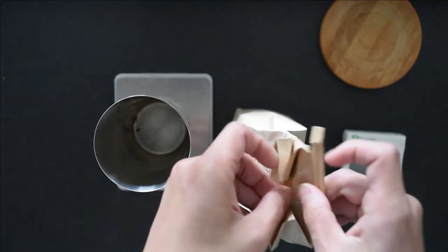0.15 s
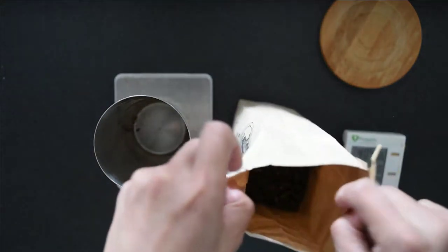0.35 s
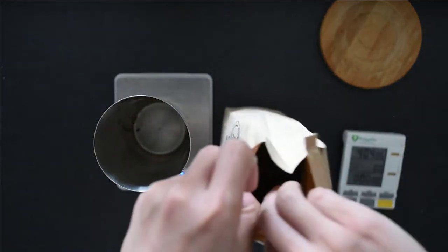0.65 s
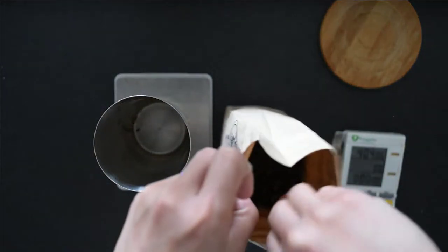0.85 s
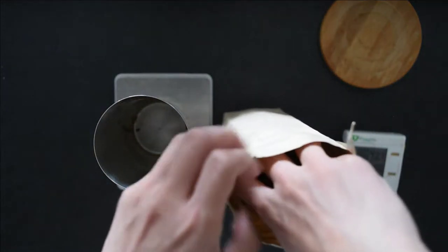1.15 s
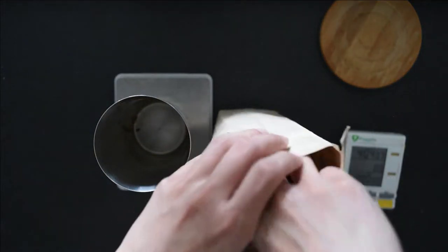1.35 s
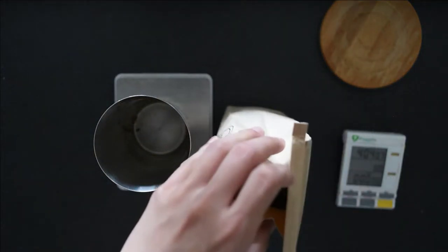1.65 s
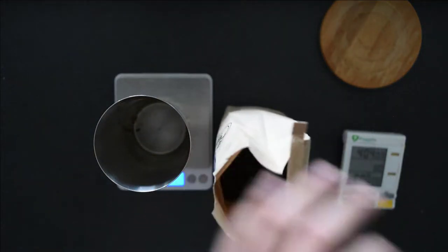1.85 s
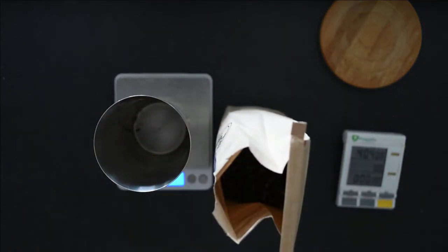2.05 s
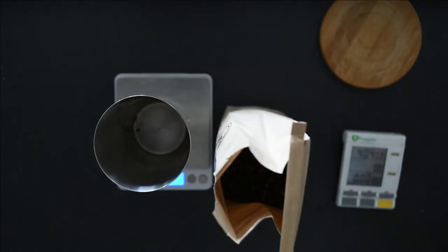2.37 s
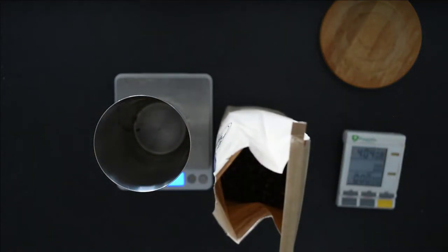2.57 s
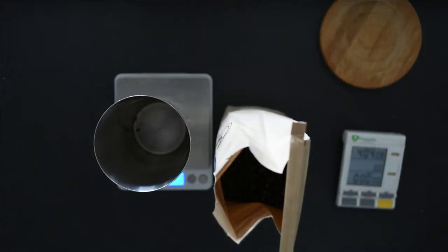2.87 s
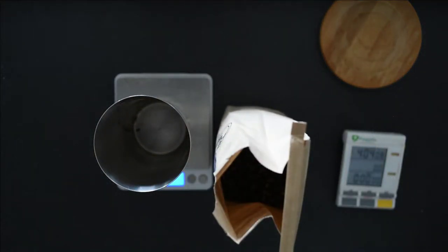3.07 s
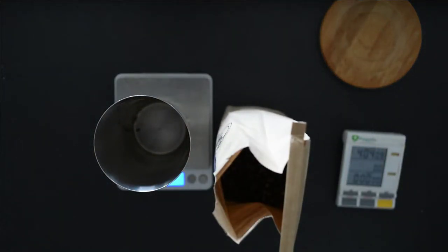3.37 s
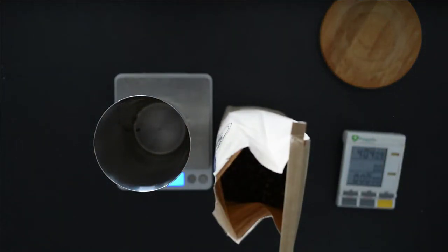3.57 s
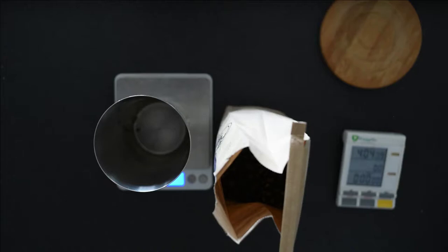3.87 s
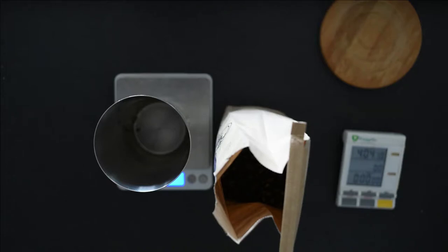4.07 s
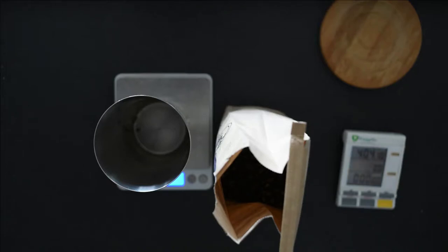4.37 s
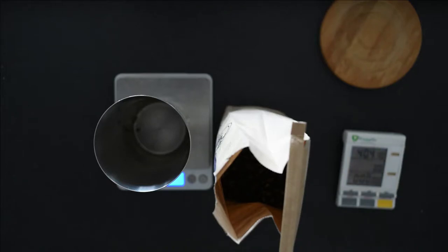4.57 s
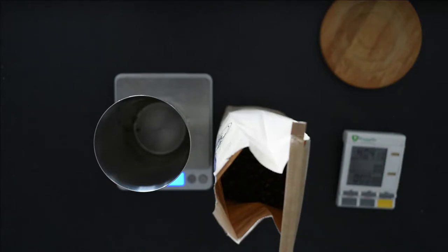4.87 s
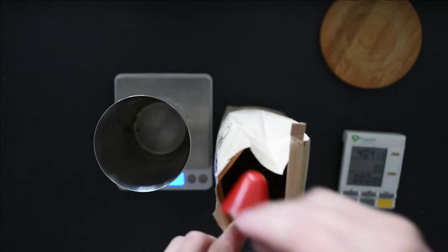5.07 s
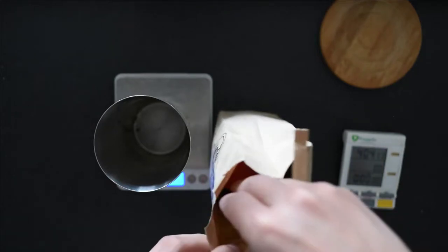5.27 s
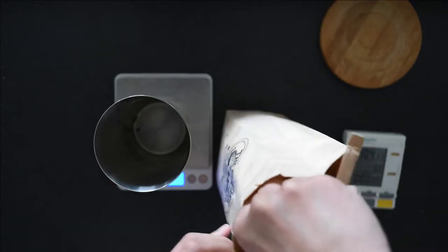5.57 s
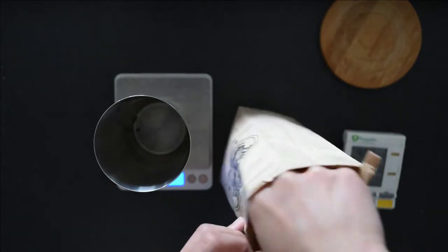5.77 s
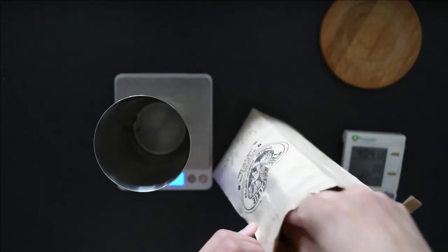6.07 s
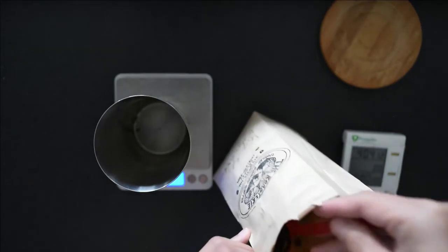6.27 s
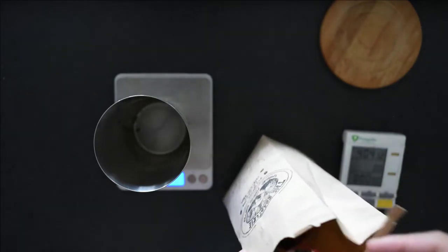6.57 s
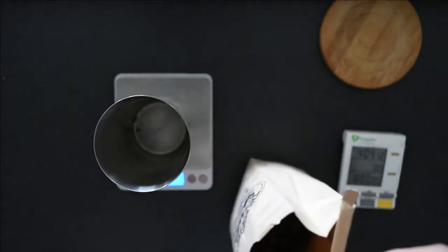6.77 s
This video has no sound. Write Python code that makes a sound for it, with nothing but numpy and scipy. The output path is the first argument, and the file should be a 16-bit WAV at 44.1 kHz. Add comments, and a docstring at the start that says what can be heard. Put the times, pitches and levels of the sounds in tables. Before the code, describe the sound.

A quiet kitchen with a faint soft rush and short room echo, heard close in stereo. From 0 to 0.2 s paper rustles lightly, then from 0.2 to 0.5 s stiff creases snap loudly in a dense run with hollow wall pops. Smaller crinkles follow; another crackling burst comes at 1.0 to 1.2 s and a last one around 1.4 to 1.5 s, fading by 1.9 s. Near silence until about 2.75 s, when a wooden drawer bumps softly to the left. Utensils clack at 3.3 s and clatter from 3.6 to 3.7 s, with light sliding to 4.1 s; the drawer thuds shut at 4.35 s. From 5.1 s a scoop taps the bag, knocking faster from 5.5 s. Beans crunch and grind, strongest at 5.8 to 6.3 s, with crisp paper cracks. After 6.4 s it thins to tiny bean ticks and quiet.

```python
"""Opening a bag of coffee beans

A stiff paper bag is pulled open on a table in a quiet kitchen, close to a microphone with two ports.
Creases snap as decaying runs of slips filtered by paper resonances; walls rustle as dense small contacts.
Off to the left a drawer slides, utensils clatter and the drawer thuds shut: damped modes of a wooden box.
Then a scoop taps its way into the bag and digs through the beans, and a few tick as it is lifted out."""
import sys
import numpy as np
from scipy import signal
from scipy.fft import rfft, irfft
from scipy.io import wavfile
from scipy.ndimage import uniform_filter1d

SR = 44100
rng = np.random.default_rng(int(sys.argv[2]) if len(sys.argv) > 2 else 0)


def wrap_up_sound(samples):
    """Save the sound to the file named by the first command line argument, as 16-bit audio."""
    columns = np.atleast_2d(samples).T
    # keep every value between -1 and 1, then stretch to whole-number steps
    tamed = np.clip(columns, -1, 1)
    steps = np.round(tamed * 32767).astype(np.int16)
    wavfile.write(sys.argv[1], SR, steps)


N = 305613
TIME = np.arange(N) / SR  # s
TOP_HZ = 16500
FIRM_DB = -34  # handling gentler than this has relatively more body

# broad spectrum of the paper: (frequency [Hz], gain [dB])
PAPER = [(47, -57), (80, -25.5), (178, -16.5), (369, -9), (550, -10), (734, -3), (820, -7.5), (937, -3),
         (1430, -3.5), (1740, -1.5), (3170, -7.5), (3540, -5), (3960, -12), (8410, -10), (13000, -21),
         (16000, -31.5)]
# resonances of the empty paper walls: (frequency [Hz], width [Hz], peak over the broad spectrum [dB])
BAG_RINGS = [(373, 12, 5), (1154, 59, 3), (1555, 100, 2), (3760, 170, -0.5), (4365, 610, 6.5),
             (5150, 340, 2), (7220, 182, 3), (8640, 410, 1)]


def undb(db):
    """Decibels are logarithmic: 20 dB is a tenfold amplitude."""
    return 10 ** (np.asarray(db) / 20)


def rms(x):
    """Root mean square amplitude, the measure of mean power."""
    return np.sqrt(np.mean(x ** 2)) + 1e-12


def add(out, s, x):
    """Superposition: sound pressures add, here x into out from time s on."""
    i = max(int(s * SR), 0)
    out[..., i:i + x.shape[-1]] += x[..., :N - i]


def band(x, lo_hz, hi_hz):
    """Causal band-pass: only the frequencies between two cutoffs are passed."""
    edges = [lo_hz, min(hi_hz, SR / 2 - 1)]
    return signal.sosfilt(signal.butter(3, edges, "band", fs=SR, output="sos"), x)


def colour(x, points, rings, size=4096):
    """Source and filter: a minimum-phase body with a broad spectrum and a few resonances shapes x."""
    f = np.fft.rfftfreq(size, 1 / SR) + 1
    hz, db = np.transpose(points)
    broad = np.interp(np.log(f), np.log(hz), db)
    peaks = sum(d / (1 + (2 * (f - c) / w) ** 2) for c, w, d in rings)
    # folding the cepstrum onto positive times gives minimum phase
    cepstrum = irfft(np.log(undb(broad + peaks)))[:size // 2]
    cepstrum[1:] *= 2
    response = irfft(np.exp(rfft(cepstrum, size)))
    return signal.fftconvolve(x, response)[:len(x)]


def widen(mid, side, wide_hz, side_db):
    """Spatial coherence: two close ports hear the same bass but differ in the treble."""
    high_pass = signal.butter(2, wide_hz, "high", fs=SR, output="sos")
    side = undb(side_db) * signal.sosfilt(high_pass, side)
    return np.array([mid + side, mid - side])


def left_first(pair, count):
    """Path difference: sound from the left reaches the right port count samples later."""
    return np.array([pair[0], np.roll(pair[1], count)])


def room_tone():
    """Stationary filtered noise: a faint rush with a thin electrical whine, and rumble in each port."""
    # broad spectrum of the quiet room: (frequency [Hz], gain [dB])
    quiet_colour = [(15, -68), (25, -29), (49, -10), (91, -12), (155, -2), (232, -1), (265, -7),
                    (328, -2.5), (478, -7.5), (700, -7.5), (1470, -8.5), (5630, -22), (11000, -28),
                    (15200, -35)]
    # its resonances: (frequency [Hz], width [Hz], peak over the broad spectrum [dB])
    quiet_rings = [(308, 73, 5.9), (9510, 1200, 9.4), (15690, 124, 4.5)]
    mid, side = (colour(rng.standard_normal(N), quiet_colour, quiet_rings) for port in range(2))
    rush = widen(mid, side, 1124, -2.0) * undb(-61) / rms(mid)
    rumble = band(rng.standard_normal((2, N)), 20.4, 135)
    return rush + undb(-91.5) * rumble / rms(rumble)


def snap(row, points, rings, body_db, glint_db, pan_db, attack_s, panel_db, uneven_db,
         table_db, table_t60, treble_t60, side_db, size=4096):
    """Stick-slip: a quick run of unequal slips rings one panel; the table and things nearby scatter it."""
    # parts of a snap (body, middle, crack, glint): (from [Hz], to [Hz])
    snap_zones = [(125, 700), (700, 3200), (3200, 10000), (10000, 17000)]
    _, db, crack_db, hz, t60 = row
    # a gentler snap keeps more body and glint; a sharper crack brings more glint (dB per dB)
    gentle = FIRM_DB - db
    body = body_db + 0.3836 * gentle
    glint = glint_db + 0.5339 * gentle + 1.25 * crack_db
    zone_db = (body, 0, crack_db, glint)
    t = np.arange(size) / SR
    slips = undb(uneven_db * rng.standard_normal(size))
    slips = slips / rms(slips) * undb(-60 * t / t60)
    scatter = undb(table_db - 60 * t / table_t60)
    shape = (1 - np.exp(-t / attack_s)) * (slips + scatter)
    panel = (hz, hz / 2, panel_db)
    pair = []
    for port in range(2):
        burst = colour(shape * rng.choice([-1, 1], size), points, rings + [panel])
        total = 0
        for (lo, hi), part_db in zip(snap_zones, zone_db):
            # the higher the part, the sooner it is damped
            part = band(burst, lo, hi) * undb(-60 * t / treble_t60 * lo / TOP_HZ)
            total = total + undb(db + part_db) * part / rms(part[:int(.006 * SR)])
        pair.append(total)
    return widen(*pair, 1760, side_db) * undb(np.array([[pan_db], [-pan_db]]) / 2)


def pops(rows, t60, rough_db, attack_s, size=8192):
    """Damped flexural mode: a broad thin wall flexes once and rings hollow, with a rough edge."""
    out, t = np.zeros(N), np.arange(size) / SR
    for s, db, hz in rows:
        rough = band(rng.standard_normal(size), hz / 2, hz * 2)
        ring = np.sin(2 * np.pi * hz * t) + undb(rough_db) * rough / rms(rough)
        envelope = undb(db - 60 * t / t60) * (1 - np.exp(-t / attack_s))
        add(out, s, envelope * ring)
    return out


def ticks(per_s, spread_db):
    """Poisson-like impulses: lone clicks at random moments, most small and a few large."""
    sizes = undb(spread_db * np.minimum(rng.exponential(size=N), 3)) * rng.choice([-1, 1], N)
    clicks = sizes * (rng.random(N) < per_s / SR)
    return clicks / rms(clicks)


def grains(per_s, spread_db, crackle_per_s, crackle_db, bed_db):
    """Granular excitation: small contacts ring a few cycles each, with broad crackles and even rubbing."""
    pitched = np.zeros(N)
    for c in 180 * 2. ** np.arange(7):  # octave centres in Hz
        clicks = ticks(per_s * np.sqrt(c / 1000), spread_db)
        pitched += band(clicks, c / np.sqrt(2), c * np.sqrt(2))
    # crackle power decays with a time constant of 0.94 ms
    decay = np.exp(-1 / (0.00094 * SR))
    crackle = signal.lfilter([1], [1, -decay], ticks(crackle_per_s, spread_db) ** 2)
    noise_power = undb(2 * crackle_db) * crackle / crackle.mean() + undb(2 * bed_db)
    return pitched + np.sqrt(noise_power) * rng.standard_normal(N)


def strokes(rows, attack_s, release_s):
    """Powers add: each stroke swells up to its time, holds and dies away; gains for low, middle, high."""
    power = np.zeros((3, N))
    for s, length, db, hiss_db, low_db in rows:
        rise = np.clip((TIME - s) / attack_s + 1, 0, 1)
        fall = np.exp(-np.clip((TIME - s - length) / release_s, 0, 20))
        power += np.outer(undb([db + low_db, db, db + hiss_db]), rise * fall) ** 2
    return np.sqrt(power)


def rustle(gains, contacts, points, rings, side_db):
    """Friction noise: contacts excite a body; the handling sets its low, middle and high parts."""
    # parts of a rustle (low, middle, high): (from [Hz], to [Hz])
    zones = [(60, 700), (700, 3200), (3200, 17000)]
    loudness = np.sqrt(np.abs(uniform_filter1d(contacts ** 2, size=64)))
    scattered = loudness * rng.standard_normal(N)
    pair = []
    for push in (contacts, scattered):
        sound = colour(push, points, rings)
        parts = [band(sound, *zone) for zone in zones]
        pair.append(sum(p / rms(p) * gain for p, gain in zip(parts, gains)))
    return widen(*pair, 1700, side_db)


def bag():
    """Snap-through buckling: creases crack over a fine crinkle as hands open the bag.

    Its walls pop then, and again while the scoop works."""
    # creases snapping through: (time [s], level of 700-3200 Hz [dB], crack 3-10 kHz over it [dB],
    # panel pitch [Hz], t60 of the slips [s])
    creases = [(0.0093, -37, 3.5, 2130, .008), (0.0577, -42.5, 6.5, 1820, 0.014),
               (0.1124, -41.5, -3, 1930, .025), (0.2158, -31, -9, 1650, .01),
               (0.2338, -24.5, -16, 2010, 0.0098), (0.24, -22.5, 6, 3420, 0.0096),
               (0.2437, -26, 3, 2220, 0.051), (0.2569, -25, 0, 1540, .011),
               (0.2601, -23, -10.5, 1480, .008), (0.2654, -18, -5.5, 2110, 0.011),
               (0.2974, -27, -13, 1630, 0.014), (0.3186, -23.5, -19, 1400, 0.0063),
               (0.3275, -19.5, -12.5, 1810, 0.0083), (0.3426, -24.5, -4, 1270, 0.012),
               (0.3931, -19.5, -1, 1570, 0.042), (0.515, -22.5, -9, 1446, 0.022),
               (0.6049, -46, -14.5, 1350, .02), (0.6739, -39.5, -10, 1320, 0.095),
               (0.7584, -45.5, -7, 1060, 0.044), (0.9736, -24, -3, 2010, .05),
               (1.0143, -18.5, -7, 2020, 0.01), (1.0198, -23, -10, 1865, 0.045),
               (1.0268, -28.5, 11, 1930, 0.017), (1.0315, -28.5, 0, 1840, .022),
               (1.0419, -25.5, -0.5, 1960, 0.015), (1.0757, -27, -12, 1720, .027),
               (1.0817, -29.5, -10, 1690, .038), (1.1051, -27.5, 0, 2400, .014),
               (1.1476, -18.5, -8.5, 2150, 0.014), (1.164, -28, -1, 1830, 0.031),
               (1.2115, -38, -2.5, 1580, 0.02), (1.3914, -32, -1, 2150, 0.017),
               (1.429, -35.5, -17, 1040, .025), (1.4369, -27.5, -7.5, 1620, 0.027),
               (1.5048, -21, -4, 1450, 0.021), (1.5176, -21.5, -4.5, 1490, 0.013),
               (1.5245, -22.5, -5, 1620, 0.014), (1.8226, -44, -11, 1030, 0.1),
               (1.8697, -50, -8, 1410, 0.047)]
    # a whole wall buckling with a hollow pop: (time [s], level [dB], pitch [Hz])
    buckles = [(0.2657, -21.5, 480), (0.3275, -26, 586), (0.3935, -20, 385), (0.674, -41.5, 159),
               (1.027, -31, 184), (1.089, -38, 480), (1.388, -40, 188), (5.1696, -43, 190),
               (5.2273, -32, 596), (6.0561, -28.5, 400), (6.2509, -29.5, 425), (6.285, -37, 192)]
    # hands pulling and smoothing the paper: (time [s], length [s], level before trim [dB],
    # hiss over that level [dB], flapping over that level [dB])
    pulls = [(0, 0.09, -45.5, -3, -7.5), (.19, 0.097, -48, 2.5, -10), (.285, .07, -37.5, -8, -2),
             (.41, 0.028, -43, -8, 1.5), (.55, 0.03, -49.5, -21, -16), (.67, 0.1, -52.5, -6.5, -0.5),
             (.82, 0.16, -55, 1.5, -13), (.975, 0.093, -41, -12, -3), (1.075, 0.076, -34.5, -2.5, -7.5),
             (1.19, 0.043, -51, -3, 1), (1.33, 0.027, -46, -2, -13), (1.38, 0.092, -43, -8, -7.5),
             (1.53, 0.021, -44.5, -3, 5), (1.6, 0.11, -58.5, -3, -6), (1.855, 0.016, -56, -5, 3)]
    out = np.zeros((2, N))
    for row in creases:
        crack = snap(row, PAPER, BAG_RINGS, body_db=-17.5, glint_db=-9, pan_db=0.4, attack_s=0.00081,
                     panel_db=7.0, uneven_db=5.5, table_db=-19.0, table_t60=0.066,
                     treble_t60=0.084, side_db=-7.5)
        add(out, row[0], crack)
    out += pops(buckles, t60=0.053, rough_db=-7, attack_s=0.0017)
    crinkle = grains(per_s=190, spread_db=2.5, crackle_per_s=140, crackle_db=-2, bed_db=-5)
    gains = undb(-0.75) * strokes(pulls, attack_s=0.024, release_s=0.034)  # trim in dB
    out += rustle(gains, crinkle, PAPER, BAG_RINGS, side_db=-3.5)
    return left_first(out, count=1)


def kitchen(x, wet_db, build_s=0.0016, size=32768):
    """Reverberation: diffuse echoes of hard walls decay exponentially; the high treble dies first."""
    # decay of the kitchen: (frequency [Hz], t60 [s])
    room_decay = [(150, 0.44), (400, 0.57), (1200, 0.5), (3000, 0.43), (7000, 0.42), (14000, 0.26)]
    t, (hz, t60) = np.arange(size) / SR, np.transpose(room_decay)
    pair = []
    for port in range(2):
        tail = np.zeros(size)
        for c in 90 * 2. ** np.arange(8):  # octave centres in Hz
            noise = band(rng.standard_normal(size), c / np.sqrt(2), c * np.sqrt(2))
            tail += noise * undb(-60 * t / np.interp(np.log(c), np.log(hz), t60))
        tail *= 1 - np.exp(-(t / build_s) ** 2)
        pair.append(signal.fftconvolve(x.mean(0), tail / np.linalg.norm(tail))[:N])
    return undb(wet_db) * widen(*pair, 935, -1.6)


def thuds(size=16384):
    """Modal impact: each bump is a short rough push on a wooden box; softer contact is duller."""
    # the drawer bumping its frame: (time [s], level before trim [dB], contact [s], heft below 150 Hz [dB])
    bumps = [(2.744, -46.5, 0.0041, -6), (2.756, -44, 0.0063, -14), (2.826, -51, 0.0024, -5.5),
             (4.347, -37, 0.00065, 8), (4.353, -32, 0.0028, 0), (4.367, -42, 0.00064, -10.5),
             (4.377, -35.5, 0.0034, -2)]
    # modes of its wooden box: (frequency [Hz], relative level before contact and heft [dB], t60 [s])
    box_modes = [(73, -30.5, 0.16), (112, -6.5, 0.18), (150.5, -10, 0.092), (231.7, 4, 0.11),
                 (305.6, -4, 0.15), (413, -10.5, 0.11), (580, -18, 0.039), (799, -3, 0.075),
                 (890, 0.5, 0.077), (1024, -3.5, .08), (1490, -34, 0.047)]
    out, t = np.zeros(N), np.arange(size) / SR
    for s, db, contact_s, heft_db in bumps:
        ring = np.zeros(size)
        for hz, d, t60 in box_modes:
            gain = undb(d + heft_db * (hz < 150) - 60 * t / t60) / np.hypot(1, hz * contact_s)
            ring += gain * np.sin(2 * np.pi * hz * t)
        top_hz = np.clip(2.02 / contact_s, 400, 1800)
        scuff = band(rng.standard_normal(size), 144, top_hz) * undb(-60 * t / 0.05)
        # levels are set over the first 20 ms
        blow = ring / rms(ring[:SR // 50]) + undb(-3.5) * scuff / rms(scuff[:SR // 50])
        add(out, s, undb(db - 1.5) * blow * (1 - np.exp(-t / contact_s)))  # trim of -1.5 dB
    # the thuds carry no deep bass
    return band(out, 66, 3300)


def drawer():
    """Airborne and structure-borne sound: sliding and knocks from the left, bumps equal in both ports."""
    # utensils knocking: (time [s], level of 700-3200 Hz [dB], crack 3-10 kHz over it [dB],
    # pitch [Hz], t60 of the slips [s])
    knocks = [(2.7749, -57, 10, 1160, 0.024), (3.3139, -26, -11.5, 1210, 0.018),
              (3.583, -32, -2, 1910, 0.017), (3.6311, -27.5, -14.5, 1460, .016),
              (3.6533, -30, -19, 1020, 0.015), (3.6744, -33, -24, 940, 0.029), (3.723, -35, -5, 1270, 0.04),
              (3.7285, -37.5, -24, 1240, 0.04), (3.9396, -42.5, -7.5, 1420, .016),
              (3.9784, -34, -11.5, 1750, .035), (4.068, -42.5, -15, 1660, 0.021)]
    # a heavy utensil dropping on the floor of the tray: (time [s], level [dB], pitch [Hz])
    drops = [(3.3138, -27.5, 440), (3.583, -37, 464), (3.7286, -38, 407)]
    # the drawer running and things sliding in it: (time [s], length [s], scrape before trim [dB],
    # hiss over that level [dB], rumble over that level [dB])
    slides = [(2.77, 0.1, -57.5, -5.5, 3), (2.89, .08, -63.5, 3.5, 2), (3.27, 0.047, -56.5, -3.5, -2),
              (3.33, 0.074, -46, -13, -5), (3.56, 0.019, -42, -10, -8), (3.63, .12, -49.5, -27, -2),
              (3.83, 0.28, -52.5, -8, -26), (3.92, 0.021, -45.5, -10, -6.5), (4.22, 0.1, -67, 4.5, -14),
              (4.34, 0.056, -53.5, -3, -3.5)]
    # broad spectrum of the utensils: (frequency [Hz], gain [dB])
    utensils = [(59, -46), (100, -30), (308, -13), (424, -1.5), (662, -7), (768, -13.5), (1550, -16),
                (2080, -9.5), (2580, -6.5), (4020, -12.5), (4770, -7), (5300, -10), (7610, -12),
                (9410, -13), (16000, -38)]
    # broad spectrum of the drawer runners: (frequency [Hz], gain [dB])
    runners = [(47, -56), (80, -10), (142, -13), (194, -53), (232, -3), (431, 8), (550, -5.5), (1400, -4),
               (1700, -5), (2970, -9), (5520, -13), (9610, -11.5), (16000, -41)]
    # resonances of the utensil tray: (frequency [Hz], width [Hz], peak over the broad spectrum [dB])
    tray_rings = [(404, 56, 5.7), (865, 170, 3.6), (1540, 230, 4.3), (2700, 59, 1.5), (7150, 190, 2.6)]
    out = np.zeros((2, N))
    for row in knocks:
        knock = snap(row, utensils, tray_rings, body_db=-17.5, glint_db=-18.5, pan_db=2.5,
                     attack_s=0.00023, panel_db=12.5, uneven_db=4, table_db=-6.5, table_t60=0.17,
                     treble_t60=0.054, side_db=-5)
        add(out, row[0], knock)
    out += pops(drops, t60=0.068, rough_db=-9, attack_s=0.0011)
    sliding = grains(per_s=260, spread_db=2.5, crackle_per_s=120, crackle_db=-6.0, bed_db=-2.5)
    gains = undb(-1.5) * strokes(slides, attack_s=0.027, release_s=.022)  # trim in dB
    out += rustle(gains, sliding, runners, tray_rings, side_db=-3.5)
    return left_first(out, count=7) + thuds()


def scoop():
    """Impact and granular friction: the scoop taps, grinds through beans, and a few tick as it leaves."""
    # the scoop striking bag and beans: (time [s], level of 700-3200 Hz [dB],
    # crack 3-10 kHz over it [dB], panel pitch [Hz], t60 of the slips [s])
    taps = [(5.1153, -52, 1.5, 3700, 0.071), (5.1698, -43.5, -1, 1680, 0.087),
            (5.2273, -29, -5.5, 1140, 0.013), (5.319, -40, -1, 1240, 0.048), (5.3868, -44, -3, 1350, 0.08),
            (5.4832, -38, -6.5, 1260, 0.019), (5.5223, -35.5, -15, 1590, 0.017),
            (5.5517, -33.5, -9, 1330, 0.063), (5.5673, -32.5, -14, 1310, .015),
            (5.5711, -25, -16, 1290, 0.019), (5.6309, -27.5, -5, 1300, 0.0062),
            (5.6779, -19, -14.5, 1890, 0.011), (5.6494, -36, -20, 1220, .01),
            (5.7407, -32, -12, 1740, 0.015), (5.7456, -25, -4, 1520, 0.018),
            (5.8382, -22.5, -1.5, 1500, 0.025), (5.8519, -26, 3, 1860, 0.019),
            (6.0168, -33, -9, 1490, .028), (6.0407, -21.5, -5.5, 1520, .03), (6.0558, -19, -3, 1550, 0.014),
            (6.2163, -25, -1, 1580, 0.036), (6.2509, -27.5, -6, 1160, 0.032),
            (6.3381, -30.5, -11.5, 1230, 0.0042), (6.367, -24.5, -11.5, 1480, .018),
            (6.3736, -31.5, -13, 1140, 0.058)]
    # single beans as the scoop is lifted out: (time [s], level of 700-3200 Hz [dB],
    # crack 3-10 kHz over it [dB])
    bean_ticks = [(6.4417, -44.5, -3.5), (6.5067, -40.5, -2), (6.5681, -45, -6), (6.6525, -44, -5),
                  (6.664, -44, -7), (6.6708, -44, -1), (6.7105, -52.5, 10.5), (6.715, -39, -5.5),
                  (6.7477, -48.5, 2.5)]
    # how hard the scoop works through the beans: (time [s], level [dB])
    digging = [(5.13, -79.5), (5.18, -48), (5.28, -56), (5.32, -53), (5.42, -52.5), (5.56, -48),
               (5.72, -43.5), (5.77, -37.5), (5.84, -34), (5.89, -42.5), (5.93, -34), (6.01, -40.5),
               (6.07, -30), (6.27, -29.5), (6.309, -39), (6.42, -49.5), (6.488, -46), (6.62, -55.5),
               (6.92, -78)]
    # a further ring heard while the scoop works: (frequency [Hz], width [Hz], peak over the broad spectrum
    # [dB])
    scoop_rings = [(1104, 30, 5)]
    # broad spectrum of the beans: (frequency [Hz], gain [dB])
    bean_colour = [(47, -50), (80, -18), (369, -3), (527, -1), (672, -1.5), (802, 1.5), (1560, 5.5),
                   (2080, 2), (2780, 2), (3240, -10.5), (4330, -12.5), (4830, -13), (8230, -14),
                   (12800, -22.5), (16000, -35)]
    # resonances of the filled bag: (frequency [Hz], width [Hz], peak over the broad spectrum [dB])
    bean_rings = [(375, 91, 2), (1200, 250, 3.2), (1390, 110, 2.7), (3760, 240, 6.4), (4400, 280, 2.8),
                  (5360, 400, 3), (8300, 230, 4)]
    out = np.zeros((2, N))
    for row in taps:
        tap = snap(row, PAPER, BAG_RINGS + scoop_rings, body_db=-13.5, glint_db=-12.5, pan_db=-.5,
                   attack_s=0.00055, panel_db=11.5, uneven_db=4.5, table_db=-17.5, table_t60=0.083,
                   treble_t60=0.13, side_db=-8)
        add(out, row[0], tap)
    for row in bean_ticks:
        # every bean shares a pitch of 1420 Hz and a slip t60 of 0.026 s
        tick = snap((*row, 1420, 0.026), PAPER, BAG_RINGS, body_db=-16.5, glint_db=-4, pan_db=-0.5,
                    attack_s=0.00037, panel_db=8.5, uneven_db=9.0, table_db=-17.0, table_t60=0.039,
                    treble_t60=0.084, side_db=-8.5)
        add(out, row[0], tick)
    s, db = np.transpose(digging)
    effort = np.interp(TIME, s, db, left=-120)
    # the walls flap relatively more under a light hand (dB per dB)
    flap = effort - 10.5 + 0.3428 * (FIRM_DB - effort)
    hiss = effort - 4.5
    gains = undb([flap, effort, hiss])
    beans = grains(per_s=380, spread_db=3.5, crackle_per_s=150, crackle_db=-4.0, bed_db=-6.5)
    out += rustle(gains, beans, bean_colour, bean_rings, side_db=-6.0)
    return left_first(out, count=1)


def scene():
    """Direct and reverberant fields add: bag, scoop and drawer all echo in the kitchen."""
    near, far = bag() + scoop(), drawer()
    echoes = kitchen(near, wet_db=-15.0) + kitchen(far, wet_db=-11.5)
    return near + far + echoes + room_tone()


def record(dry):
    """Band limiting: the recorder's steep low-pass cuts the top."""
    return signal.sosfilt(signal.ellip(10, .2, 70, TOP_HZ, fs=SR, output="sos"), dry)


dry = scene()
out = record(dry)
wrap_up_sound(out)
```